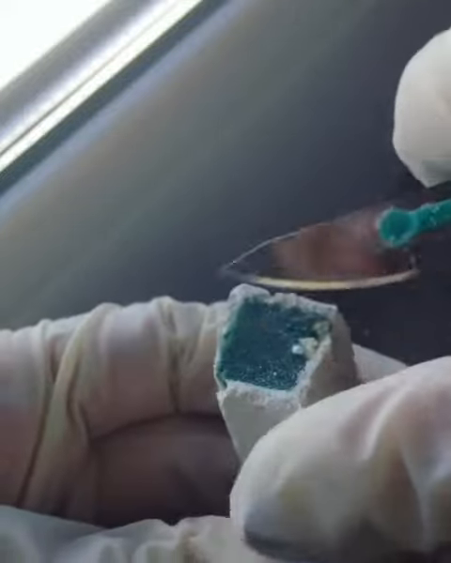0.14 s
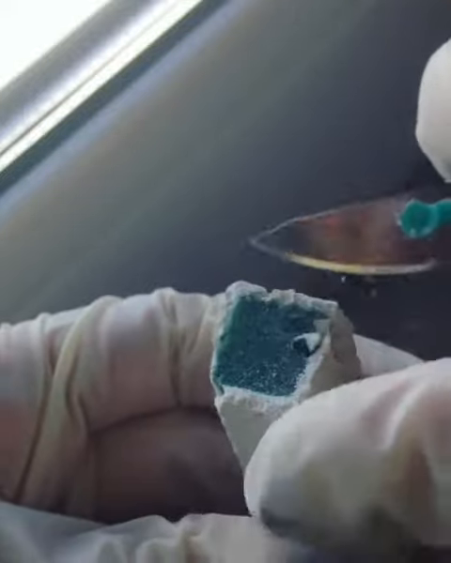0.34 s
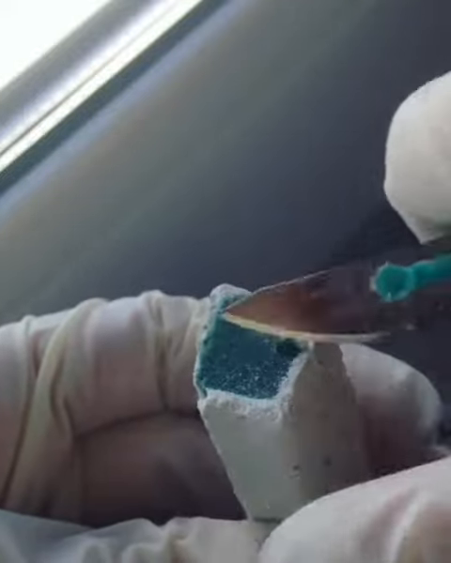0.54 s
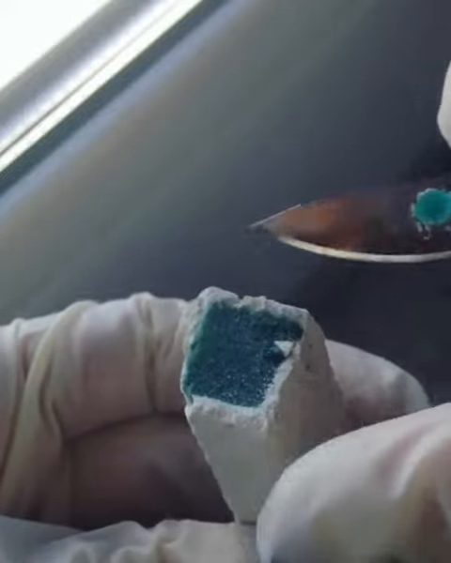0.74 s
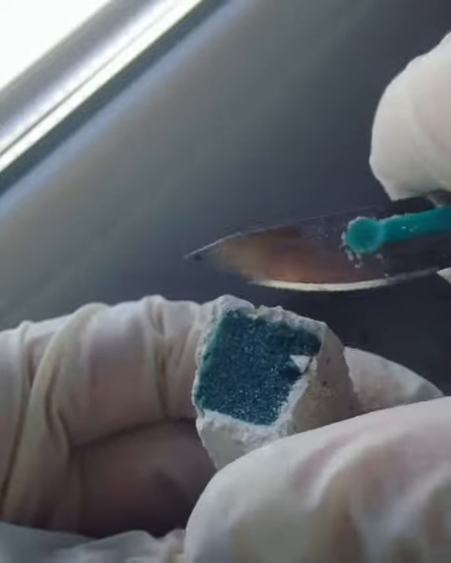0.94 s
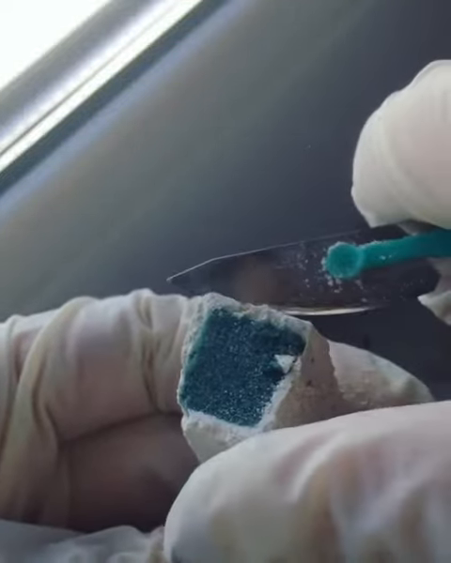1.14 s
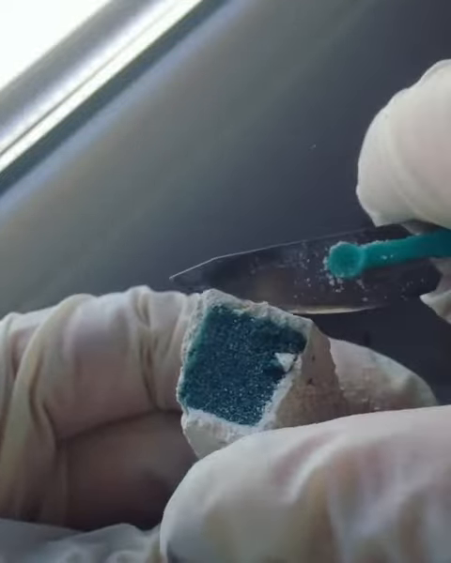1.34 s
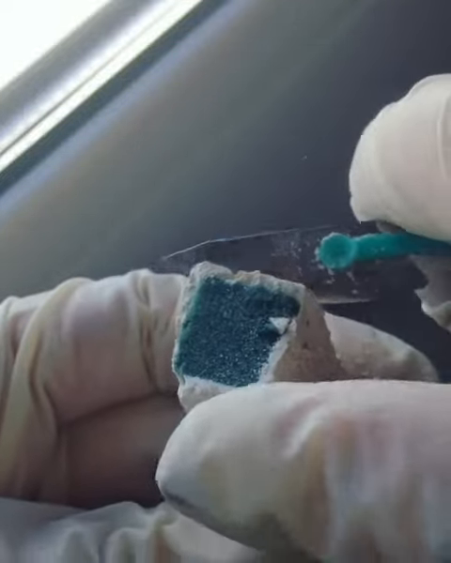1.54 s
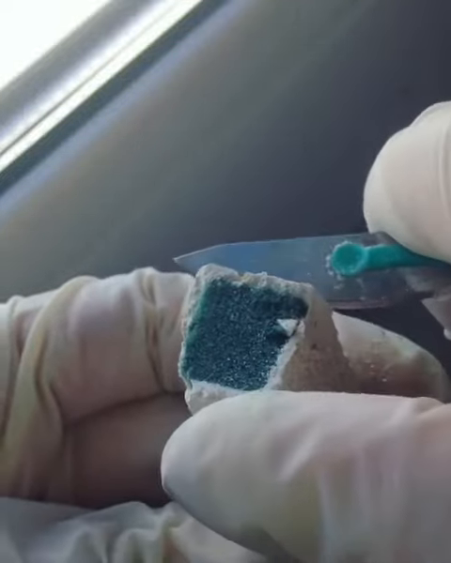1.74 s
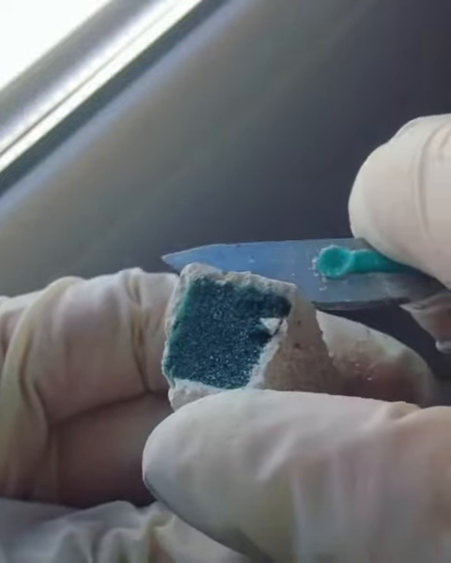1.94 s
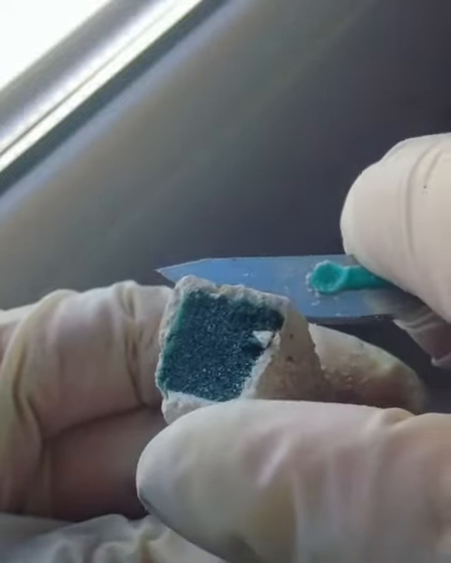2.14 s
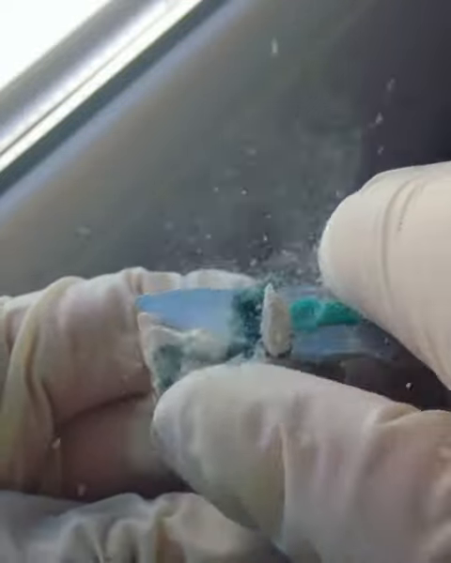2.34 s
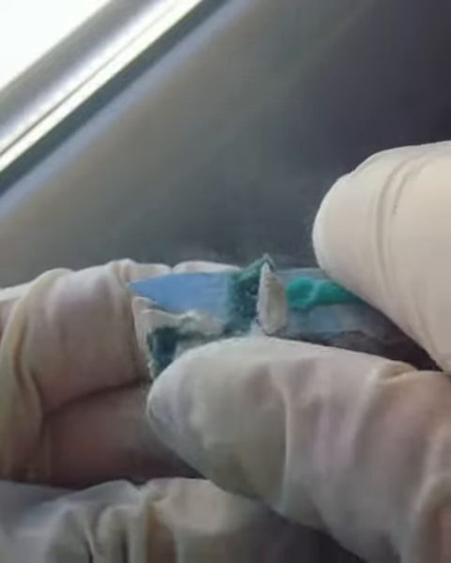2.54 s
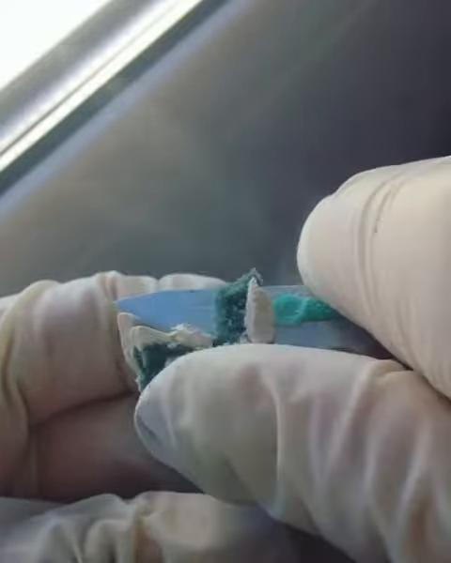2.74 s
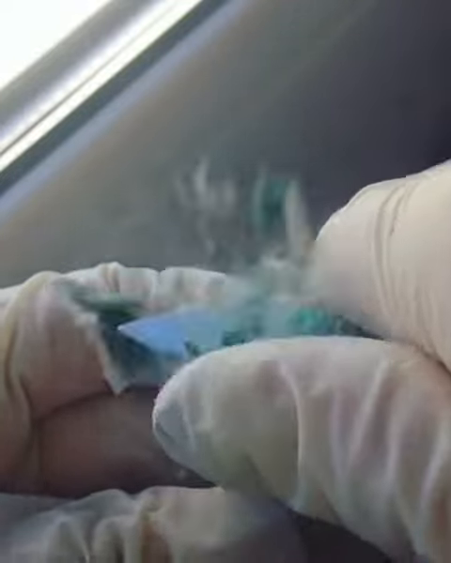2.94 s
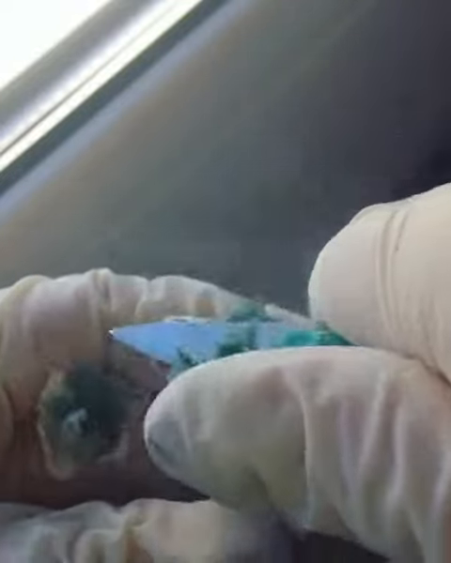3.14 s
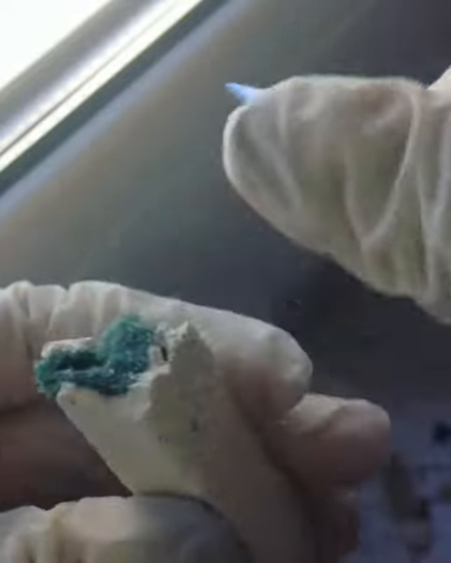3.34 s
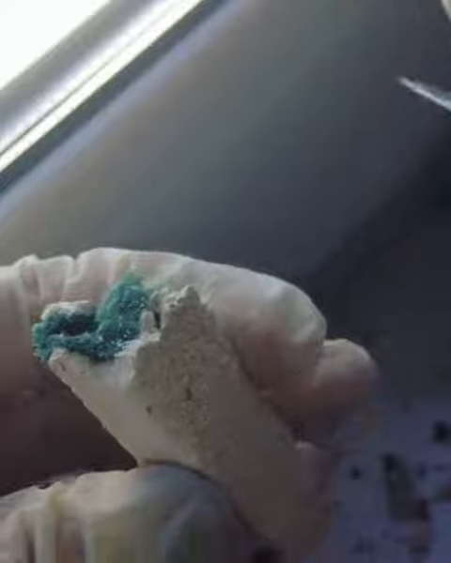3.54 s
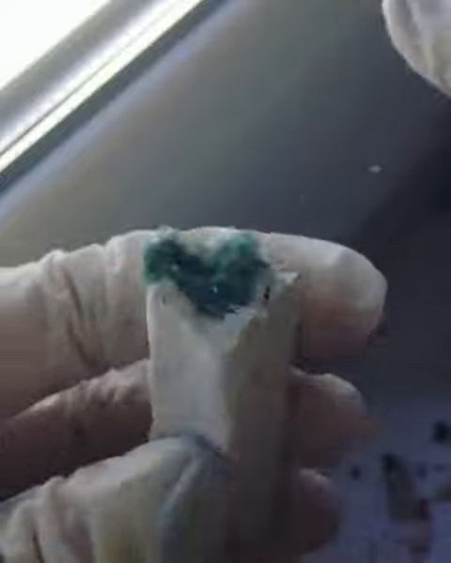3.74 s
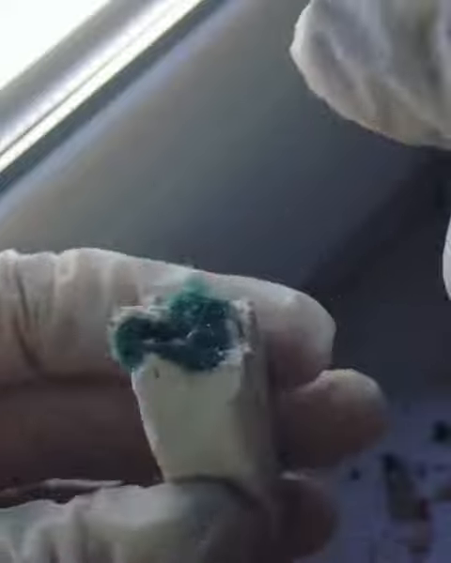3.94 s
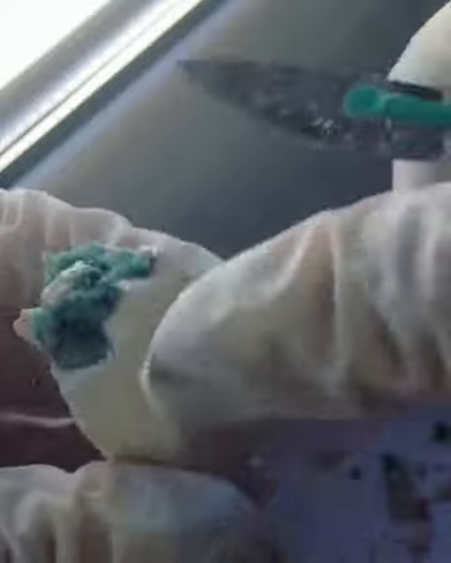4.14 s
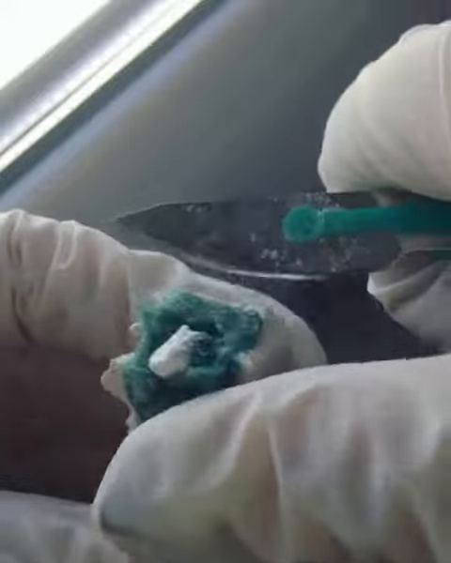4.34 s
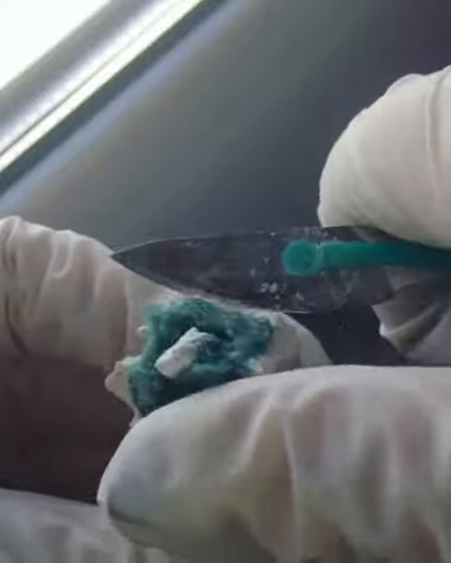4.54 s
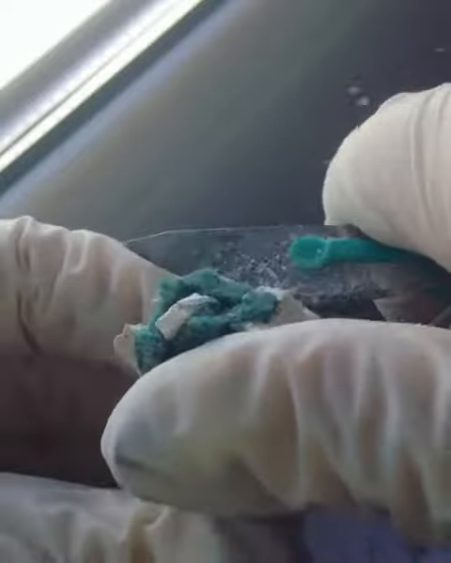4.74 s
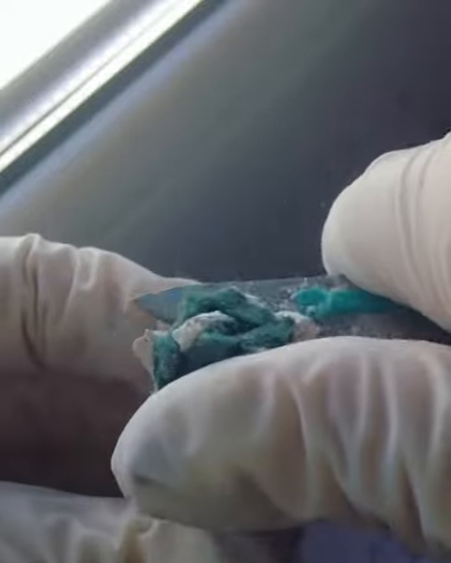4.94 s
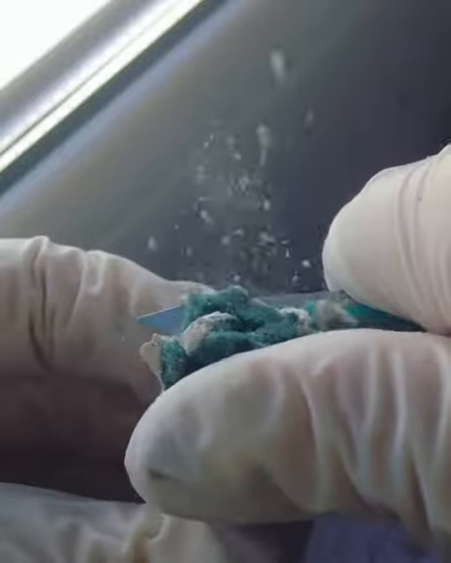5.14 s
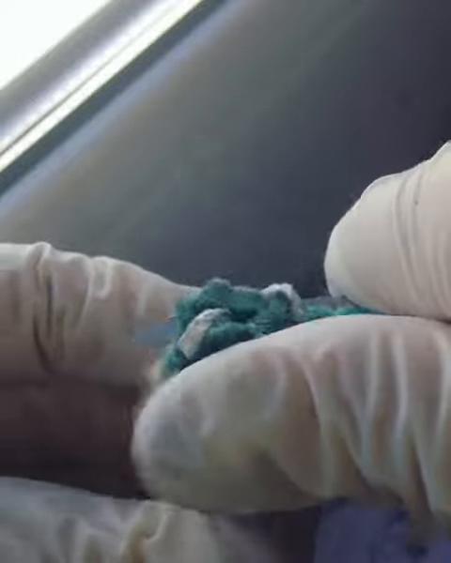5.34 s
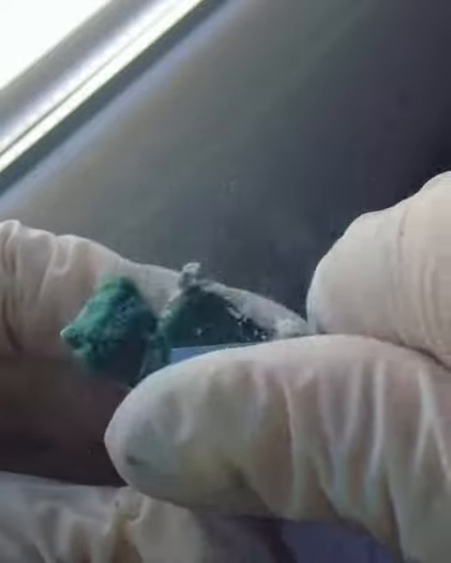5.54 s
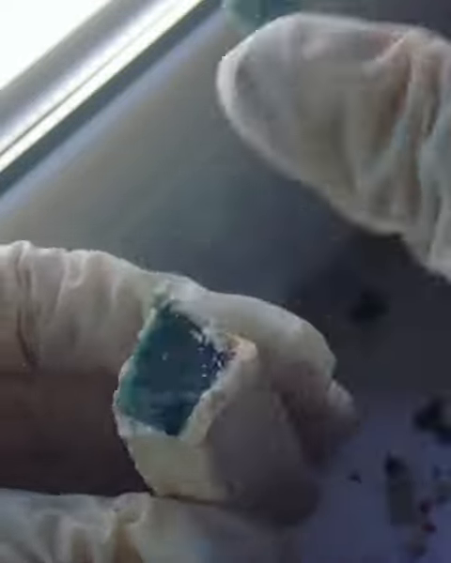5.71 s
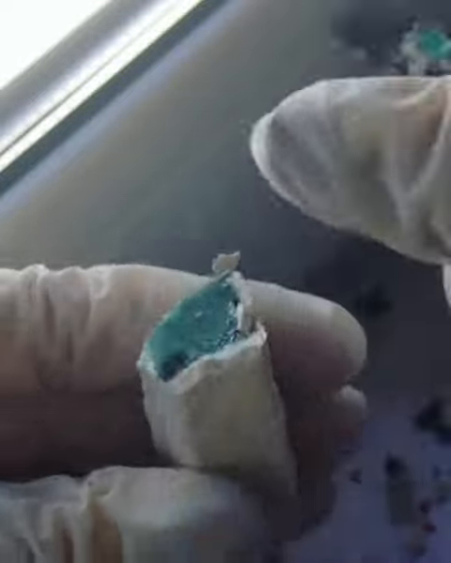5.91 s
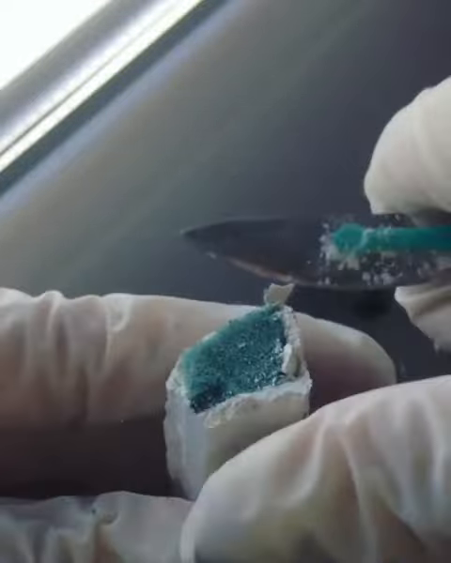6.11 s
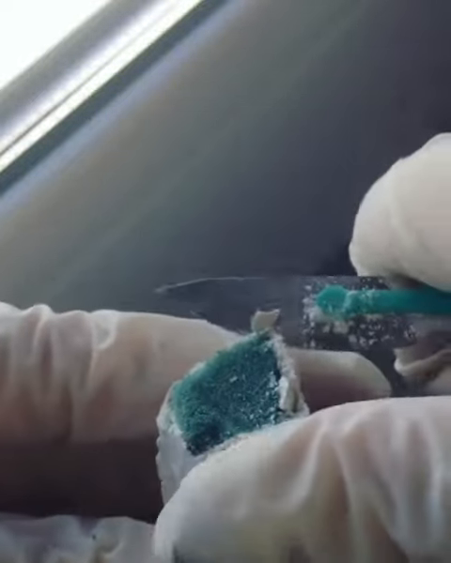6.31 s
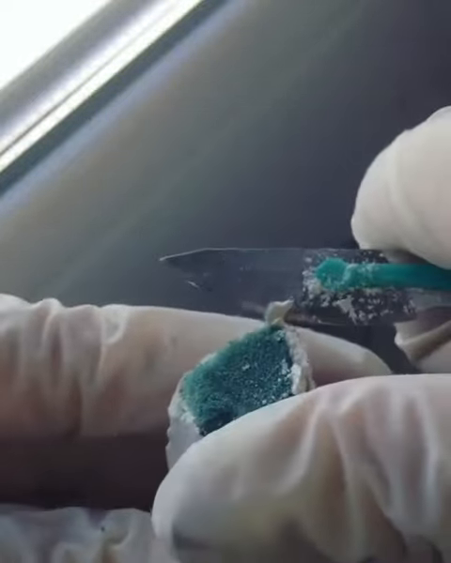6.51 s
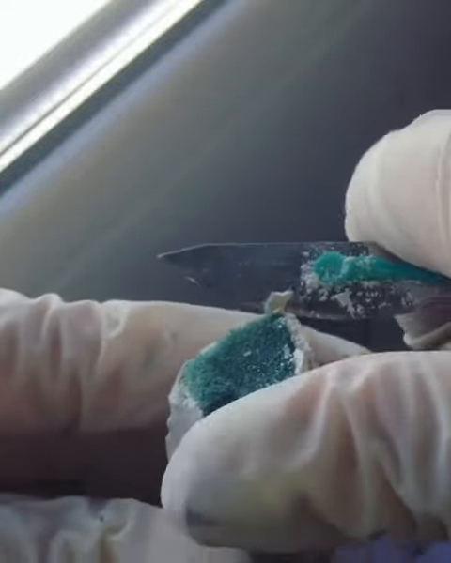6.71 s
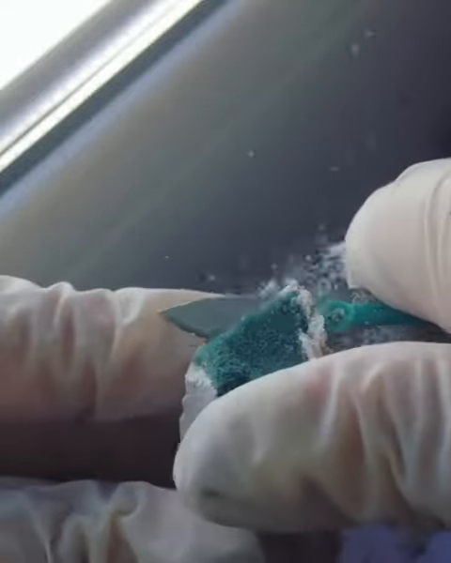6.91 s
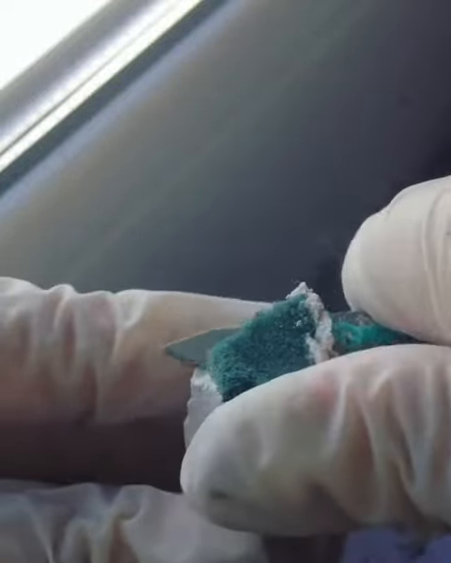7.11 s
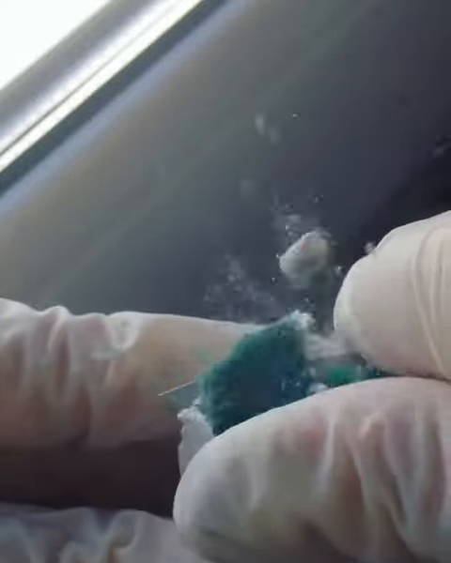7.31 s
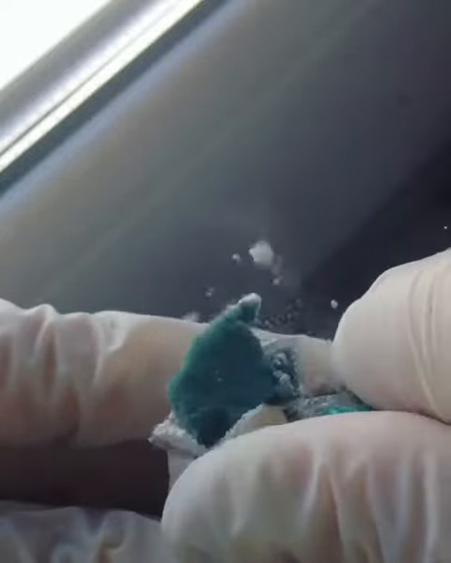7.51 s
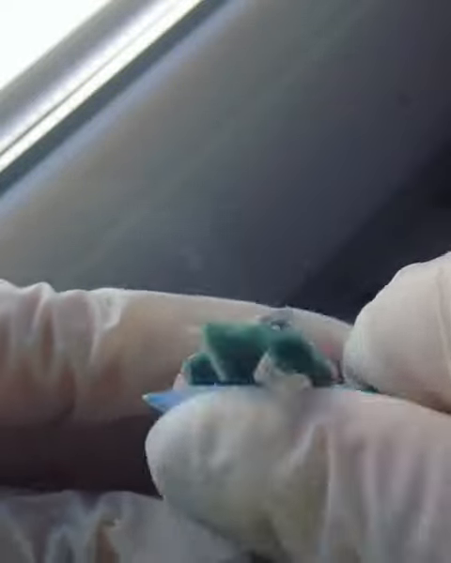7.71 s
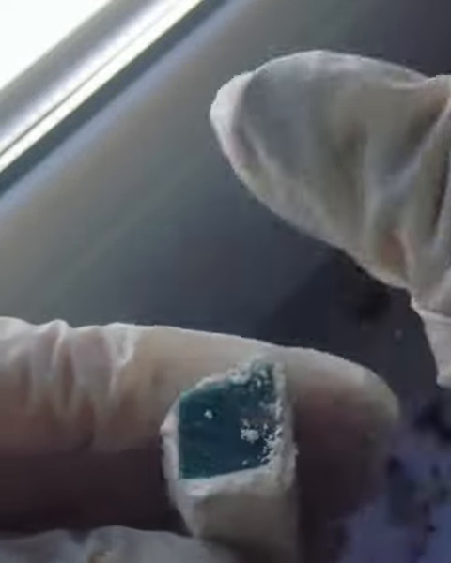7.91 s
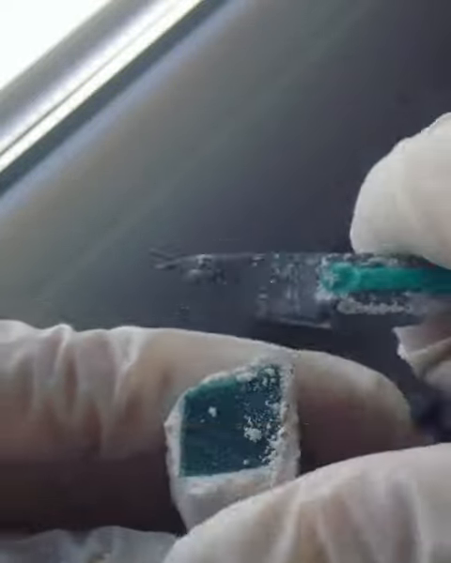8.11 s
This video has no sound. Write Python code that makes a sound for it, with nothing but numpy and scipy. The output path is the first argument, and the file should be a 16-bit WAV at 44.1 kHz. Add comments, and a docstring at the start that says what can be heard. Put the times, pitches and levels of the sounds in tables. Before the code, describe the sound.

A craft knife works through a brittle, chalky block held in gloved hands. First come small metallic ticks and gritty scrapes, then loud double snaps, a brief metallic clink, another sharp crack and rattling chips. Two later crunching bouts shed crumbs and pieces onto the table. Close microphone, little reverberation, quiet low room tone beneath.

```python
"""Over a low room hum, a thin hiss and a trickle of crumbs (filtered noise and random grains), a small
knife first skims a dry, crumbly block: grit scrapes and pours, and nicks excite the blade's resonances.
Chips then fall and ring as they knock on the table; the crust cracks in bursts of micro-fractures, the
hand jolts, and a chip clinks on metal as decaying sines. Later the blade is buried, the table
shudders once, cracks and chips go on, and a faint fluttering tone passes, sagging in pitch."""
import sys
import numpy as np
from scipy import signal
from scipy.io import wavfile
from scipy.ndimage import uniform_filter1d

SR = 44100
rng = np.random.default_rng(int(sys.argv[2]) if len(sys.argv) > 2 else 0)


def field_ratio(decibels):
    """Amplitude ratio for a level in dB (20 dB per decade); scalars and array-likes work."""
    return 10 ** (np.asarray(decibels, dtype=float) / 20)


def unload_audio(sound):
    """Save the sound as a 16-bit wav file, at the path given as the first command line argument."""
    columns = np.transpose(np.atleast_2d(sound))
    # keep every value between -1 and 1, then stretch to whole-number steps
    steps = np.round(np.clip(columns, -1, 1) * 32767)
    wavfile.write(sys.argv[1], SR, steps.astype(np.int16))


N = 364266

# Crust fractures; ring is relative to the snap: start_s, snap_peak_db, snap_hz, block_ring_db
CRACKS = [(2.4668, -7.5, 13300, -11.5), (2.4827, -7.5, 7300, -2.5), (2.5137, -23.5, 7400, 5),
          (2.7464, -35.5, 4900, 14.5), (3.1263, -7, 7000, -10.5), (3.7518, -29.5, 6960, 8.5),
          (4.7393, -32.5, 8800, -20.5), (4.8649, -9.5, 10350, -11.5), (4.9627, -19.5, 9600, -3.5),
          (5.0105, -27.5, 8200, -4), (5.0272, -17.5, 6530, -7), (5.032, -18.5, 8750, -4),
          (5.2931, -14, 9400, -3.5), (5.5457, -12.5, 6150, 3), (5.827, -31, 7930, -2),
          (6.9153, -30, 8200, 4), (6.9959, -17.5, 7400, -5), (7.0383, -12, 10000, -9),
          (7.0794, -10.5, 9700, -9.5), (7.1881, -25, 8600, 0), (7.2473, -27, 9300, -1),
          (7.4315, -28, 11900, -11), (7.456, -13, 7150, 0), (7.6012, -19.5, 7740, 5),
          (7.6592, -16.5, 7300, -4.5), (7.6711, -21.5, 8100, -1.5), (7.7205, -24.5, 7750, -2)]
# The free blade nicks the crust while it skims: start_s, snap_peak_db
NICKS = [(0.1824, -22.5), (0.4126, -45.5), (0.4596, -26.5), (0.4683, -23.5), (0.5075, -29), (0.7395, -26),
         (0.7733, -18), (0.7855, -27), (0.972, -41), (1.0161, -51), (1.4551, -36), (2.379, -56),
         (2.4314, -49.5)]
# Chips landing on the table: start_s, ring_peak_db, ring_hz
CHIPS = [(1.562, -43.5, 4070), (2.786, -33, 6600), (3.308, -23.5, 1500), (3.35, -34, 2300),
         (3.415, -37.5, 2470), (3.461, -28, 3770), (3.477, -16.5, 2060), (3.568, -32, 3170),
         (3.65, -36, 4150), (3.775, -23.5, 2370), (3.856, -39, 6200), (3.921, -45, 4550),
         (4.896, -37.5, 9400), (5.718, -32, 3170), (5.77, -16.5, 2030), (5.783, -23.5, 1780),
         (5.856, -32.5, 8040), (5.942, -28.5, 1004), (5.988, -35, 3360), (6.043, -40.5, 2540),
         (6.056, -40.5, 6950), (6.098, -44, 1300), (6.147, -42, 2840), (6.158, -40.5, 3470),
         (6.325, -53, 2130), (6.344, -39.5, 2170), (6.5, -45.5, 1440), (6.522, -42, 4040),
         (6.544, -41, 3980), (6.62, -46, 1970), (6.651, -55, 4600), (6.718, -39.5, 2750),
         (7.286, -36, 1360), (7.51, -44, 4020), (7.793, -19, 2820), (7.817, -45, 7160), (7.859, -49, 1510),
         (7.873, -20, 3200), (7.893, -43, 1600), (8.043, -46, 3500), (8.056, -34, 4500),
         (8.183, -26.5, 1680), (8.191, -23, 2240), (8.219, -43, 446), (8.24, -33.5, 2000)]
# Jolts as the block gives way: start_s, swing_db
JOLTS = [(2.481, -31.5), (3.124, -40), (5.032, -36.5), (5.291, -31), (5.545, -47), (6.996, -33.5),
         (7.036, -34), (7.078, -36), (7.453, -39), (7.599, -40.5), (7.661, -42)]
# Scraping grit, written as swelling to its end; dull is relative: start_s, length_s, end_level_db, dull_db
GRINDS = [(0.095, 0.093, -43.5, -22), (0.447, 0.064, -43, -18), (0.717, 0.075, -41.5, -17),
          (1.03, 0.066, -66, -15), (5.13, 0.077, -48, -35), (6.39, 0.046, -60.5, 0),
          (7.19, 0.064, -44.5, -17), (8.2, 0.05, -60.5, 10)]
# Crumbs pour out after a slip or break; dull is relative: start_s, length_s, start_level_db, dull_db
POURS = [(0.008, 0.031, -40, -13), (0.2, 0.093, -59.5, -8), (2.49, 0.11, -43, -1.5),
         (2.72, 0.13, -54.5, 13.5), (3.13, 0.086, -49.5, 1.2), (4.87, 0.05, -56, -12),
         (5.035, 0.073, -42, -30), (5.43, 0.1, -34.5, -18), (5.555, 0.04, -43, -10),
         (5.77, 0.15, -58.5, 19), (6.515, 0.08, -61, 7.5), (7.0, 0.034, -51, -22), (7.085, 0.061, -56, -25),
         (7.265, 0.045, -42, -4), (7.46, 0.055, -43.5, -8), (7.66, 0.097, -47, 3.5)]
# Resonances of the block, nominal: pitch_hz, width_hz, level_db
BLOCK_MODES = [(1360, 720, -14), (2130, 250, -6.5), (3280, 1580, -5)]
# Resonances of the blade, nominal: pitch_hz, width_hz, level_db
BLADE_MODES = [(4650, 700, -1.5), (6630, 450, 5), (7750, 970, -5.5), (12000, 2100, -2.5)]
# Resonances of a chip, nominal: pitch_ratio (times ring_hz), width_ratio (of mode pitch), level_db
CHIP_MODES = [(0.549, 0.26, -9.5), (1, 0.15, 1.5), (1.5, .2, -7), (2.2, 0.18, -6.5)]
# Modes of the thin metal, relative levels: pitch_hz, level_db, decay_t60_s
METAL_MODES = [(1250, -7, 0.063), (1850, -7.5, 0.046), (2610, -14.5, 0.35), (4820, -8.5, 0.11),
               (5700, -3.5, 0.069), (6820, 2, 0.048), (8370, 2, 0.041), (9970, -6.5, 0.065),
               (11800, 0, 0.055)]
# Crumb sizes, large to fine, relative levels: pitch_hz, level_db
CRUMB_SIZES = [(1300, -9), (3000, -4), (6500, 0), (11500, -4)]
# Spectrum of the room air, relative density: frequency_hz, density_db
AIR_SPECTRUM = [(25, -37), (65, -7), (127, -13.5), (161, -9), (300, -17.5), (579, -25.5), (3180, -38),
                (5560, -36), (14500, -41)]

AIR_DB = -68
HUM_HZ, HUM_WANDER_HZ, HUM_DB = 166.3, 4, -76.5
TONE_START_S, TONE_END_S, TONE_DB = 6.61, 6.87, -69
TONE_HZ, TONE_SAG_HZ_PER_S, TONE_FLUTTER_HZ = 456, 200, 28  # pitch at mid-tone
BURIED_S = 2.7  # from here the blade sits deep in the block and its modes are left out
GRIND_DB_PER_S, POUR_DB_PER_S = 136, -190
NICK_HZ, NICK_BLOCK_DB = 7300, -19  # a nick hardly moves the block
LIGHT_TICK_DB, HEAVY_TICK_DB = -8, -32  # light chips tick brightly, heavy ones land blunt
CLINK_S, CLINK_DB = 2.63, -24
KNOCK_DB = 1.5  # relative to the swing of a jolt
RUMBLE_S, RUMBLE_DB, RUMBLE_T60_S, RUMBLE_KNOCK_DB = 3.75, -46, 0.63, -21
# Every crack and chip sheds fine crumbs that trickle on; louder ones shed a little more
CRACK_SHED_DB, CHIP_SHED_DB, SHED_DB_PER_DB = -56, -51, 0.5
SHED_RISE_S, SHED_T60_S, REST_DB = 0.03, 1.87, -78.5
THUMP_SHED_DB, THUMP_SHED_T60_S = -62.5, 4.35  # the heavy landing shakes crumbs loose for longer


def evened(x):
    """Normalization of power: scales to rms 1."""
    return x / np.sqrt(np.mean(x ** 2) + 1e-20)


def peaked(x):
    """Normalization of amplitude: scales to peak 1."""
    return x / (abs(x).max() + 1e-12)


def add(mix, s, sound):
    """Superposition: adds a sound into the mix, in place, from time s."""
    part = mix[max(round(s * SR), 0):][:len(sound)]
    part += sound[:len(part)]


def resonate(x, hz, width):
    """Simple resonance: a two-pole filter of gain 1 at its peak."""
    b, a = signal.iirpeak(min(hz, 0.45 * SR), max(hz / width, 0.3), SR)
    return signal.lfilter(b, a, x)


def through(x, modes, spread_db=0., wander=0.):
    """Modal superposition: each contact excites the modes unevenly and shifts them a little."""
    lift, shift = rng.standard_normal((2, len(modes)))
    total = 0
    for k, (hz, width, db) in enumerate(modes):
        mode = resonate(x, hz * np.exp(wander * shift[k]), width)
        total = total + (-1) ** k * field_ratio(db + spread_db * lift[k]) * mode
    return total


def fractures(size, per_s, spread_db):
    """Random impulses: tiny breaks at random moments, of random sign, a few much larger."""
    chance, sign, big = rng.random(size), rng.standard_normal(size), rng.exponential(1, size)
    return (chance < per_s / SR) * sign * field_ratio(spread_db * np.minimum(big, 4))


def clumped(size, per_s, clump_db, span):
    """Modulated random impulses: smoothed noise (span in samples) gathers grains in uneven clumps."""
    clumps = evened(uniform_filter1d(rng.standard_normal(size), round(span)))
    return fractures(size, per_s, 0.72) * field_ratio(clump_db * clumps)


def bright(drive, s, hz=9500, focus_db=-23.0):
    """Contact radiation: a wide treble snap, with the blade's modes while it is still free."""
    high = signal.butter(2, 3800, "high", fs=SR, output="sos")
    wide = signal.sosfilt(high, resonate(drive, 6840, 10000))
    blade = (s < BURIED_S) * 2.4 * through(drive, BLADE_MODES, 3.0, 0.04)
    focus = evened(resonate(drive, hz, 1200))
    return evened(wide + blade) + field_ratio(focus_db) * focus


def air():
    """Shaped random noise: room rumble and hiss follow a set spectrum that swells slowly."""
    frames, hz = N // 256 + 5, np.fft.rfftfreq(1024, 1 / SR)
    real, imaginary = rng.standard_normal((2, frames, 513)).transpose(0, 2, 1)
    table_hz, table_db = np.transpose(AIR_SPECTRUM)
    slow = uniform_filter1d(rng.standard_normal((513, frames)), 30, axis=1)
    swell = evened(uniform_filter1d(slow, 40, axis=0))
    level_db = np.interp(np.log(hz + 1), np.log(table_hz), table_db)[:, None] + 1.3 * swell
    spectrum = (real + 1j * imaginary) * field_ratio(level_db)
    noise = signal.istft(spectrum, nperseg=1024, noverlap=768)[1][:N]
    return field_ratio(AIR_DB) * evened(noise)


def hum():
    """Frequency modulation: smoothed noise makes the pitch of a low sine waver."""
    wander = evened(uniform_filter1d(rng.standard_normal(N), 9000))
    cycles = np.cumsum(HUM_HZ + HUM_WANDER_HZ * wander) / SR
    return field_ratio(HUM_DB) * evened(np.sin(2 * np.pi * cycles))


def shedding():
    """Addition of powers: each blow sets fine crumbs moving, and they drain away."""
    t = np.arange(2 * SR) / SR
    rise = 1 - np.exp(-t / SHED_RISE_S)
    power = np.full(N, field_ratio(REST_DB) ** 2)
    for table, shed_db in ((CRACKS, CRACK_SHED_DB), (CHIPS, CHIP_SHED_DB)):
        for s, db, *_ in table:
            level_db = shed_db + SHED_DB_PER_DB * db - 60 * t / SHED_T60_S
            add(power, s, (rise * field_ratio(level_db)) ** 2)
    add(power, RUMBLE_S, (rise * field_ratio(THUMP_SHED_DB - 60 * t / THUMP_SHED_T60_S)) ** 2)
    return np.sqrt(power)


def trickle():
    """Granular excitation: crumbs of each size patter in swells; ticks grow as more crumbs move."""
    level = shedding()
    patter = 0
    for hz, db in CRUMB_SIZES:
        grains = clumped(N, 2500, 4.5, 1000)
        patter = patter + field_ratio(db) * evened(resonate(grains, hz, 0.9 * hz))
    hit = np.exp(-np.arange(300) / 40) * rng.standard_normal(300)
    ticks = 0
    for hz, _ in CRUMB_SIZES:
        tap = signal.oaconvolve(fractures(N, 12, 2.0), hit)[:N]
        ticks = ticks + resonate(resonate(tap, hz, hz), hz, hz)
    return level * (evened(patter) + np.sqrt(level / field_ratio(-49.5)) * evened(ticks))


def room(x, t60=0.22, dull_hz=6000):
    """Reverberation: sparse reflections of random sign die away; the walls dull the treble."""
    t = np.arange(SR // 2) / SR
    taps = fractures(len(t), 2500, 0.) * field_ratio(-60 * t / t60) * (t > 0.004)
    b, a = signal.butter(1, dull_hz, fs=SR)
    tail = signal.lfilter(b, a, taps)
    return signal.oaconvolve(x, tail / np.linalg.norm(tail))[:N]


def grit(s, end, start_db, end_db, dull_db):
    """Granular friction: dense grains sound bright at the edge and duller through the block."""
    t = np.arange(0, end - s + 0.025, 1 / SR)
    grains = clumped(len(t), 11000, 3.3, 110)
    lumps = clumped(len(t), 2500, 4.6, 110)  # coarser, sparser breaks
    dull = evened(0.5 * resonate(lumps, 2000, 4000) + through(lumps, BLOCK_MODES, 3.2, 0.11))
    level_db = np.interp(t, [0, end - s, t[-1]], [start_db, end_db, end_db - 51.0])
    shape = np.minimum(t / 0.0083, 1) * field_ratio(level_db)
    return shape * (evened(bright(grains, s)) + field_ratio(dull_db) * dull)


def pour(s, length, db, dull_db):
    """Granular flow under a falling envelope: grit that fades from its start."""
    return grit(s, s + length, db, db + POUR_DB_PER_S * length, dull_db)


def grind(s, length, db, dull_db):
    """Granular friction under a rising envelope: scraping grit, written as swelling to its end."""
    return grit(s, s + length, db - GRIND_DB_PER_S * length, db, dull_db)


def crack(s, db, hz, block_db):
    """Brittle fracture: a run of micro-fractures snaps, rings the block and crumbles away."""
    t = np.arange(5000) / SR
    u = t / 0.0013
    burst = u * np.exp(-1.3 * u)  # swells to a sharp peak, then thins out
    crumble = field_ratio(-18.0 - 60 * t / 0.039)
    drive = fractures(len(t), 18000, 1.57) * (burst + crumble)
    block = through(drive, BLOCK_MODES, 3.9, 0.08) + 0.1 * resonate(drive, 470, 830)
    snap = peaked(bright(drive, s, hz, 3.5))
    return field_ratio(db) * (snap + field_ratio(block_db) * peaked(block))


def nick(s, db):
    """Slight brittle fracture: a crack with a fixed snap pitch and a weak block ring."""
    return crack(s, db, NICK_HZ, NICK_BLOCK_DB)


def chip(s, db, hz):
    """Impact excitation: one blow rings the chip's modes; heavy ones rattle on through them."""
    t = np.arange(6000) / SR
    heavy = np.clip((db + 64) / 30, 0.15, 1)  # louder landings count as heavier
    hit = fractures(len(t), 9000, 2.03) * np.exp(-t / 0.0022)
    hit[0] = 2.6
    rattle = clumped(len(t), 1500, 4.7, 140) * field_ratio(-11.5 - 60 * t / (0.18 * heavy))
    drive = hit + rattle
    modes = [(ratio * hz, share * ratio * hz, gain_db) for ratio, share, gain_db in CHIP_MODES]
    ring = through(drive, modes, 4.3, 0.04) + 0.27 * drive
    b, a = signal.butter(2, min(3.76 * hz, 12000), fs=SR)  # a blunt contact makes little treble
    ring = signal.lfilter(b, a, resonate(ring, hz, 2.24 * hz))
    tick_db = LIGHT_TICK_DB + heavy * (HEAVY_TICK_DB - LIGHT_TICK_DB)
    return field_ratio(db) * (peaked(ring) + field_ratio(tick_db) * peaked(bright(hit, s)))


def knock(t):
    """Damped vibration: a short dull knock at a random low pitch."""
    wave = np.cos(2 * np.pi * rng.uniform(350, 450) * t)
    return wave * np.minimum(t / 0.0006, 1) * field_ratio(-60 * t / 0.016)


def jolt(s, db):
    """Damped oscillation: a short knock with a lower swing of the hand."""
    t = np.arange(4000) / SR
    swing = np.cos(2 * np.pi * 110 * t) * np.minimum(t / 0.0051, 1) * field_ratio(-60 * t / 0.058)
    return field_ratio(db) * (field_ratio(KNOCK_DB) * knock(t) + swing)


def clink():
    """Free modal decay: a chip strikes thin metal and rattles while the modes ring out."""
    t = np.arange(9000) / SR
    drive = fractures(len(t), 9000, 1.6) * np.exp(-t / 0.013)
    rings = 0
    for hz, db, t60 in METAL_MODES:
        rings = rings + field_ratio(db - 60 * t / t60) * np.sin(2 * np.pi * (hz * t + rng.random()))
    ringing = peaked(rings * np.minimum(t / 0.0019, 1))
    return field_ratio(CLINK_DB) * (ringing + 0.68 * peaked(resonate(drive, 4700, 16000)))


def rumble():
    """Low-frequency resonance: the table knocks, then shudders unevenly after a heavy landing."""
    t = np.arange(SR // 2) / SR
    low = resonate(resonate(clumped(len(t), 3000, 1.9, 550), 95, 180), 190, 360)
    shudder = field_ratio(RUMBLE_DB - 60 * t / RUMBLE_T60_S) * evened(low)
    return shudder + field_ratio(RUMBLE_KNOCK_DB) * knock(t)


def tone():
    """Amplitude modulation: narrow noise flutters a faint sine whose pitch sags."""
    t = np.arange(N) / SR
    middle = (TONE_START_S + TONE_END_S) / 2
    cycles = np.cumsum(TONE_HZ - TONE_SAG_HZ_PER_S * (t - middle)) / SR
    flutter = evened(resonate(rng.standard_normal(N), TONE_FLUTTER_HZ, TONE_FLUTTER_HZ))
    fade = np.clip(np.minimum(t - TONE_START_S, TONE_END_S - t) / 0.035, 0, 1)
    return field_ratio(TONE_DB) * np.sin(2 * np.pi * cycles) * (1 + 0.85 * flutter) * fade


def scene():
    """Superposition of sources: close contacts, a little reverberation, and the air under all."""
    near = trickle()
    events = ((POURS, pour), (GRINDS, grind), (NICKS, nick), (CHIPS, chip), (CRACKS, crack), (JOLTS, jolt))
    for table, source in events:
        for row in table:
            add(near, row[0], source(*row))
    add(near, CLINK_S, clink())
    add(near, RUMBLE_S, rumble())
    return (near + field_ratio(-23.5) * room(near) + air() + hum() + tone())[None]


def top_cut(x):
    """Nothing passes above the cut-off."""
    return signal.sosfilt(signal.butter(12, 14980, fs=SR, output="sos"), x)


def record(dry):
    """Band limitation: the microphone loses the deepest bass and ends steeply in the high treble."""
    b, a = signal.butter(2, 34, "high", fs=SR)
    light = signal.lfilter(b, a, dry)
    edge = signal.firwin(201, 14000, window=("kaiser", 7), fs=SR)
    mix = signal.oaconvolve(light, edge[None], "same")
    return top_cut(mix)


dry = scene()
out = record(dry)
unload_audio(out)
```